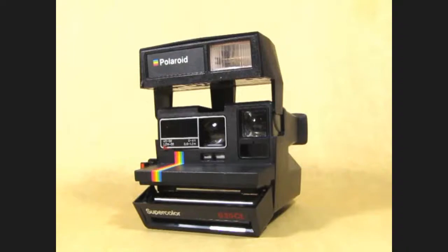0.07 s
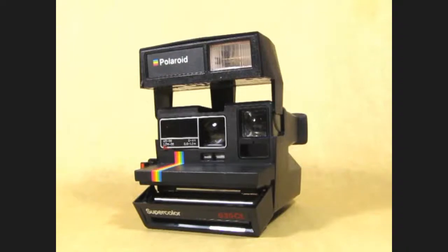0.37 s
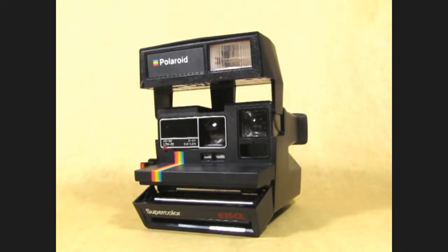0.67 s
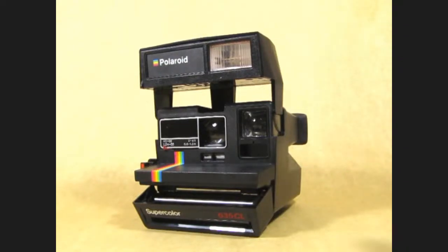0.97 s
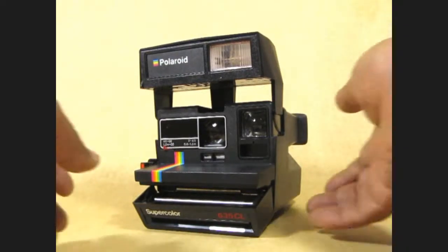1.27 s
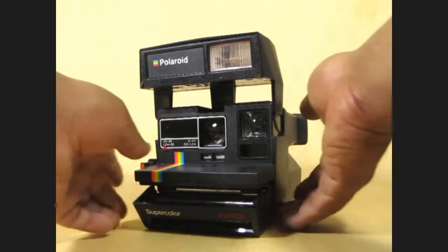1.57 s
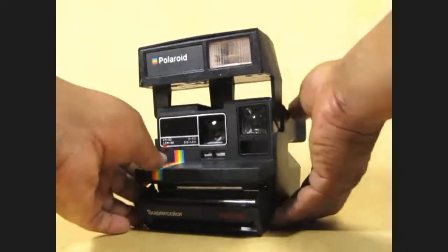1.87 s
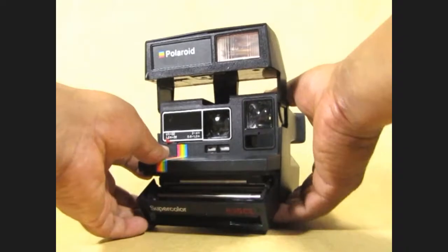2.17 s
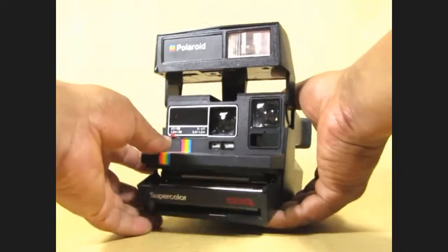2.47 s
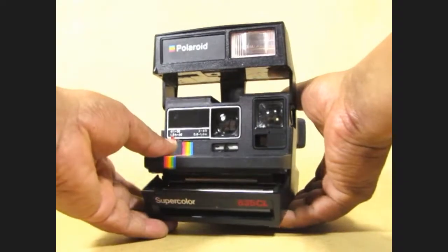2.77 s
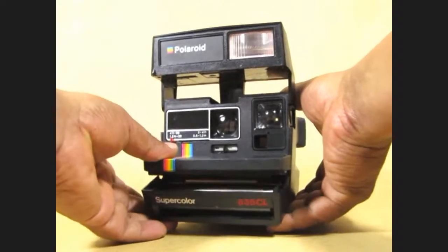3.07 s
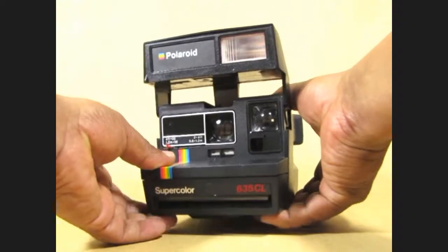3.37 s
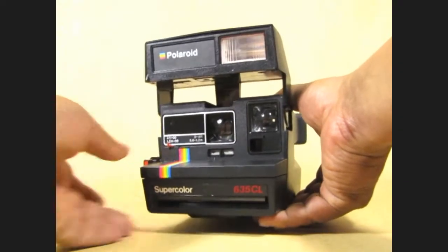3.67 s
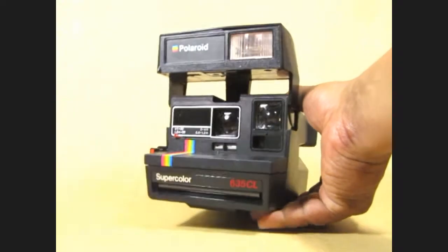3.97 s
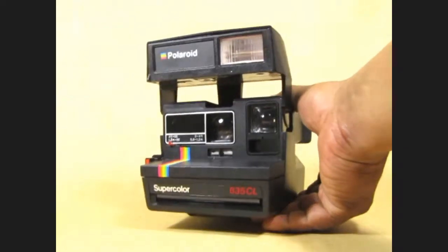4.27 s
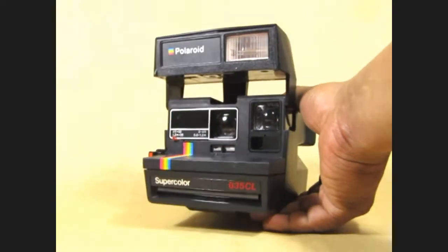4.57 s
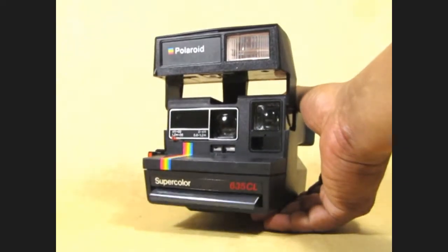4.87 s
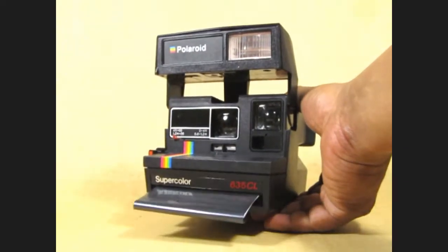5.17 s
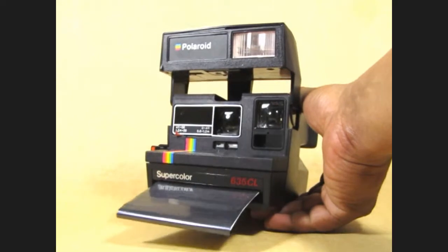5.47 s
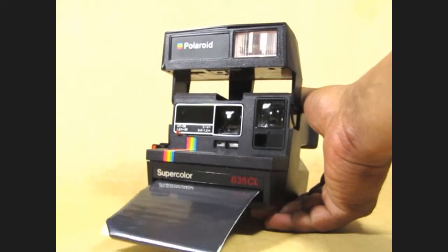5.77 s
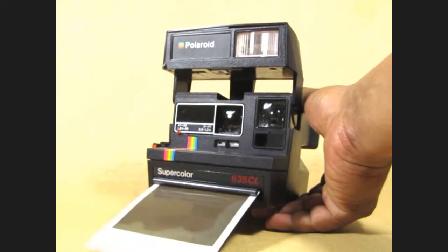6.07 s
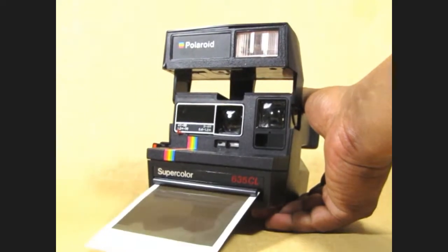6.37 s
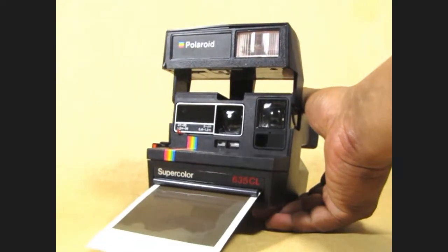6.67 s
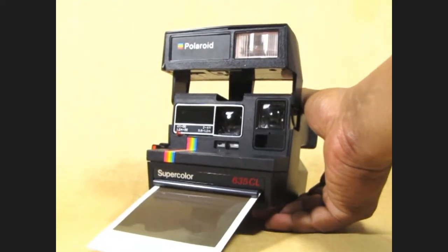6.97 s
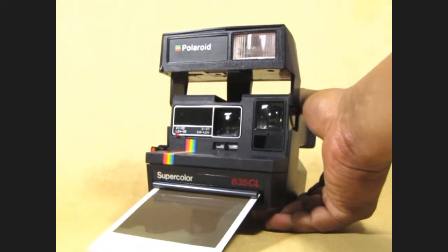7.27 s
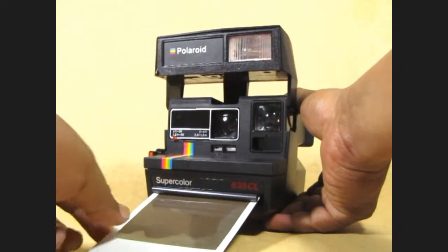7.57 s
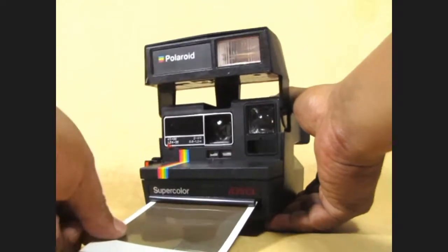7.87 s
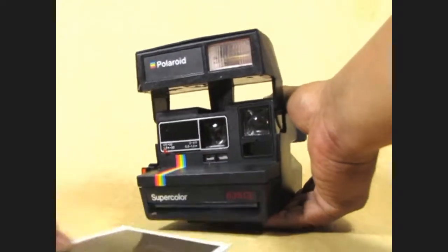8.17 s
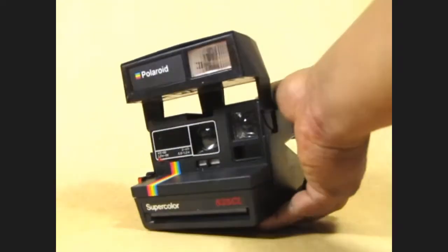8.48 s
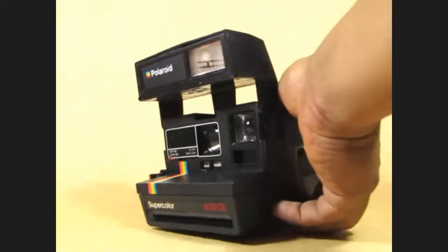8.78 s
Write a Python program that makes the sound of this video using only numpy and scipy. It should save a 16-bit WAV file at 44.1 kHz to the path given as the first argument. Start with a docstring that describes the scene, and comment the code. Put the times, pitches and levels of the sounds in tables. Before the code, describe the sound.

An instant camera is handled, its film door snaps shut, and a geared motor grinds out a picture with a sharp clack.

```python
"""Over the low drone of a small room, an instant camera is picked up from a cloth-covered table, close to
the microphone; hands rub and its plastic case ticks and creaks. The film door scrapes and snaps shut.
A geared motor grinds, sags as the rollers squeeze the picture out, clacks twice, leaving a spring ringing,
and runs out. After the snap and the clack the recorder's gain control briefly ducks everything.
Last, the picture is pulled free and the camera is turned."""
import sys
import numpy as np
from scipy import signal
from scipy.fft import rfft, irfft
from scipy.io import wavfile
from scipy.ndimage import uniform_filter1d

SR = 44100
rng = np.random.default_rng(int(sys.argv[2]) if len(sys.argv) > 2 else 0)


def inscribe(sig):
    """Save sig as 16-bit PCM at rate SR to the path in sys.argv[1].

    A 1-D sig is mono; a 2-D sig holds one channel per row.
    Samples are clipped to [-1, 1] before scaling.
    """
    pcm = np.round(np.clip(np.atleast_2d(sig).T, -1, 1) * 32767)
    wavfile.write(sys.argv[1], SR, pcm.astype(np.int16))


N = 389844
TIME = np.arange(N) / SR
HZ = np.fft.rfftfreq(N, 1 / SR)


def gain_of(db):
    """The decibel scale: amplitude grows tenfold every 20 dB."""
    return 10 ** (np.asarray(db) / 20)


def unit_rms(x):
    """Normalisation to a mean power of 1."""
    return x / np.sqrt(np.mean(x ** 2) + 1e-20)


def curve_at(points, hz):
    """Linear interpolation over log frequency."""
    point_hz, value = np.transpose(points)
    return np.interp(np.log(hz + 1), np.log(point_hz + 1), value)


def add(mix, start_s, sound):
    """Superposition: a stereo sound adds to the mix from start_s on."""
    part = mix[:, round(start_s * SR):][:, :sound.shape[1]]
    part += sound[:, :part.shape[1]]


def resonances(modes, hz):
    """Resonance: each mode (frequency, bandwidth, height) adds a Lorentzian peak."""
    return sum(height / (1 + (2 * (hz - centre) / width) ** 2) for centre, width, height in modes)


def ripple(width_hz):
    """Modal overlap: the many small resonances of a hollow body merge into a spectral ripple of rms 1."""
    fine = rng.standard_normal(len(HZ))
    for _ in range(2):
        fine = uniform_filter1d(fine, max(round(width_hz / HZ[1]), 1))
    return unit_rms(fine)


def wander(rate_hz):
    """Band-limited noise: a smooth fluctuation of rms 1, up to about rate_hz."""
    points = rng.standard_normal(int(N / SR * 2 * rate_hz) + 2)
    return unit_rms(signal.resample_poly(points, int(SR / (2 * rate_hz)) + 1, 1)[:N])


def swell(peak_s, length_s, rise_share=0.38, edge_db=-18):
    """The amplitude envelope of one movement: it rises to 1 and dies away more slowly."""
    distance = np.maximum((peak_s - TIME) / rise_share, (TIME - peak_s) / (1 - rise_share)) / length_s
    return gain_of(edge_db * np.minimum(distance, 4) ** 1.5)


def grains(per_s, size_db):
    """Shot noise: two trains of tiny impacts at random times, a few larger than the rest."""
    size = gain_of(size_db * np.minimum(rng.exponential(1, (2, N)), 5))
    return unit_rms(size * rng.choice([-1, 1], (2, N)) * (rng.random((2, N)) < per_s / SR))


def treble_of(x, hz):
    """High-pass filtering: the part of a sound above hz."""
    return irfft(rfft(x) * HZ ** 4 / (HZ ** 4 + hz ** 4), N)


def minimum_phase(db):
    """Causality: the response with this gain that rings only after it is struck."""
    cepstrum = irfft(db * np.log(10) / 20)
    half = len(cepstrum) // 2
    cepstrum[1:half] *= 2
    cepstrum[half + 1:] = 0
    return np.exp(rfft(cepstrum))


# left-right coherence of a source in front: (frequency [Hz], correlation [-])
FRONT_COHERENCE = [(600, 0.95), (1400, 0.9), (2800, 0.47), (9000, 0.5)]
def spread(pair, hz, coherence=FRONT_COHERENCE):
    """Partial coherence: two unrelated spectra become left and right, most alike in the bass."""
    correlation = np.clip(curve_at(coherence, hz), -1, 1)
    mid = pair[0] * np.sqrt((1 + correlation) / 2)
    side = pair[1] * np.sqrt((1 - correlation) / 2)
    return np.array([mid + side, mid - side])


def coloured(pair, db, coherence=FRONT_COHERENCE):
    """Source and filter: two unrelated drives become a stereo sound of rms 1, shaped by db."""
    return unit_rms(irfft(spread(rfft(pair), HZ, coherence) * gain_of(db), N))


# low noise of room and table: (frequency [Hz], relative level [dB])
RUMBLE_SPECTRUM = [(20, -8), (38, -13), (60, 2.5), (105, -11), (230, -17.5), (320, -17.5), (1000, -30.5),
                   (8000, -51), (15000, -76.5)]
# the table rumbles as the hands come in and tip the camera up, under the labouring motor,
# and as the camera is turned: (peak time [s], duration [s], level [dB])
TABLE_RUMBLES = [(0.905, 1.7, -45.5), (2.195, 3.24, -40), (4.997, 2.9, -46), (8.46, 1.1, -48)]
def rumble(drone_db=-53, hum_hz=60, hum_db=-3.5, waver=0.4):
    """Incoherent sources add in power: room drone and table set the level of a low noise and a hum."""
    table_power = sum((gain_of(db) * swell(peak_s, length_s)) ** 2 for peak_s, length_s, db in TABLE_RUMBLES)
    hum = np.sin(2 * np.pi * hum_hz * TIME + 0.51 * wander(4.0)) * (1 + waver * wander(4.8))
    noise = coloured(rng.standard_normal((2, N)), curve_at(RUMBLE_SPECTRUM, HZ))
    return np.sqrt(gain_of(drone_db) ** 2 + table_power) * (noise + gain_of(hum_db) * hum)


# resonances of the plastic case, its hollow and the cloth's rasp:
# (frequency [Hz], bandwidth [Hz], gain [dB])
CASE_MODES = [(315, 190, 9), (693, 80, 5.5), (915, 110, 6), (1800, 120, 3), (3050, 90, 2.5)]
CAVITY_MODES = [(1080, 300, -4.5), (1480, 120, 1), (2100, 500, 1.5)]
RASP_MODES = [(2330, 110, 6.4)]
# friction noise of rubbing and of dry cloth: (frequency [Hz], relative level [dB])
RUB_SPECTRUM = [(100, -12), (330, -2), (520, -6), (900, -1), (1200, 0), (2000, -4), (3500, -4.5),
                (5000, -7.5), (8000, -13), (12000, -22), (15500, -36.5)]
RASP_SPECTRUM = [(700, -29.5), (1600, -1), (2400, -1), (4600, -6), (15000, -49)]
# left-right coherence of rubbing that comes from all around: (frequency [Hz], correlation [-])
RUB_COHERENCE = [(400, 0.71), (1600, .52), (5000, .05)]
# hands and sleeves brush case and cloth:
# (peak time [s], duration [s], level [dB], relative treble [dB], relative rasp [dB])
HAND_STROKES = [(0.59, 0.27, -52.5, -1, -4.5), (0.95, 2, -58.5, -8, -2.5), (1.423, 1.2, -48, -4.5, 0),
                (1.942, 2.1, -50.5, -8, -19), (2.118, 0.17, -40, -7, -15), (2.684, 0.5, -44.5, -5, -13),
                (7.52, 0.32, -56.5, 11.5, 8), (7.926, 0.31, -46, -6, -19), (8.27, 0.88, -48, 6, 2.5),
                (8.482, 0.59, -39, 6, -4.5), (8.82, 0.91, -38, -7, -20)]
def hands(case_share=0.81, resting_db=-66.5, uneven_db=1.3, treble_hz=5200, left_lean_db=1):
    """Sliding friction: skin and cloth slip in tiny grains, and catching threads add a coarser rasp."""
    body_db = case_share * resonances(CASE_MODES, HZ) + resonances(CAVITY_MODES, HZ) + 1.5 * ripple(70)
    rub = coloured(grains(per_s=6200, size_db=0.5), curve_at(RUB_SPECTRUM, HZ) + body_db, RUB_COHERENCE)
    threads = grains(per_s=5000, size_db=1.4)
    threads_db = curve_at(RASP_SPECTRUM, HZ) + resonances(RASP_MODES, HZ) + ripple(70)
    rasp = coloured(threads, threads_db, RUB_COHERENCE)
    treble = treble_of(rub, treble_hz)
    low_power = high_power = gain_of(resting_db) ** 2  # a faint rub goes on between strokes
    rasp_power = 0
    for peak_s, length_s, db, treble_db, rasp_db in HAND_STROKES:
        power = (gain_of(db) * swell(peak_s, length_s)) ** 2
        low_power = low_power + power
        high_power = high_power + power * gain_of(treble_db) ** 2
        rasp_power = rasp_power + power * gain_of(rasp_db) ** 2
    rubbing = (rub - treble) * np.sqrt(low_power) + treble * np.sqrt(high_power)
    rubbing += rasp * np.sqrt(rasp_power)
    return rubbing * gain_of(uneven_db * wander(20)) * gain_of([[left_lean_db / 2], [-left_lean_db / 2]])


DOOR_FROM_S, DOOR_TO_S = 3.1, 3.4
# the hollow film door rings while it is pushed shut: (frequency [Hz], bandwidth [Hz], gain [dB])
DOOR_MODES = [(1040, 150, 6.5), (1240, 90, -5.5), (1435, 100, 9), (1900, 200, 2.5)]
# fingers grip the case, the door latches, the gears catch and clack, the picture snaps free, the camera
# turns: (time [s], level [dB], ring [Hz], bass re ring [dB], treble re ring [dB], decay T60 [s])
IMPACTS = [ (1.18, -33.5, 1370, -1.5, -12.5, 0.14), (1.241, -32.5, 2700, -12, -25, 0.079),
           (1.687, -42.5, 1500, -2, -22, 0.05), (1.833, -34, 600, 4, -37, 0.039),
           (1.892, -37, 1000, -12, -38, 0.085), (2.199, -38.5, 1010, -27, -38, 0.071),
           (2.3, -39, 1000, 1, -26, .12), (2.316, -27.5, 2800, -9.5, -20, 0.018),
           (2.547, -21.5, 1120, -15.5, -25.5, 0.065), (2.569, -35, 1000, -10, -19, 0.082),
           (2.709, -36.5, 298, 9, -17, 0.045), (2.908, -34.5, 3030, -8, -20, 0.022),
           (3.061, -46, 950, -5, -9.5, .032), (3.359, 3, 1110, -15, -6.5, 0.012),
           (3.377, -13, 2000, -2, 2, 0.035), (3.945, -30.5, 1200, -8, -32, 0.2),
           (4.614, -25, 855, -3, -11.5, 0.15), (5.403, -20.5, 2580, -16, -8.5, 0.049),
           (5.537, -19, 1280, -19, -20, 0.028), (5.85, -18.5, 1700, -16, -5.5, 0.021),
           (5.953, -13, 4200, -51, -10.5, 0.023), (5.968, 8.5, 2700, -27, -10.5, 0.01),
           (6.044, -9.5, 630, -18, -20, 0.048), (6.257, -17, 1170, -11.5, -17, 0.06),
           (6.521, -37, 348, 3, -26.5, 0.058), (7.053, -47, 2720, 8.5, -3, 0.044),
           (7.4, -38, 1920, -8, -18, 0.028), (8.112, -19, 760, -11, -26, 0.028),
           (8.1195, -13, 945, -3, -19, 0.016), (8.171, -37, 2720, -25, -17, 0.037),
           (8.44, -30.5, 1000, -2, -16, 0.029), (8.794, -30.5, 1710, -11, -26, 0.035)]
def knocks(soft_t60=0.4, ring_db=3, shell_hz=4600, size=16384):
    """Impact excitation: loose plastic parts chatter and die away, filtered by struck part and case."""
    t, hz = np.arange(size) / SR, np.fft.rfftfreq(size, 1 / SR)
    attack = round(0.012 * SR)  # the level holds for this opening stretch
    out = np.zeros((2, N))
    for start_s, db, ring_hz, bass_db, treble_db, t60 in IMPACTS:
        rise_s = (t60 / soft_t60) ** 2 / 20  # long knocks start softly
        chatter = rfft(rng.standard_normal((2, size)) * gain_of(-60 * t / t60) * (1 - np.exp(-t / rise_s)))
        # whiten the chatter, so that part and case alone set the colour
        chatter_db = 10 * np.log10(uniform_filter1d(abs(chatter) ** 2, size=120))
        chatter *= np.array([minimum_phase(-channel_db) for channel_db in chatter_db])
        part_spectrum = sorted([
            (60, bass_db - 10), (250, bass_db), (ring_hz, 0), (shell_hz, 0.5 * treble_db),
            (6300, 0.82 * treble_db), (10000, treble_db - 4), (15000, 1.6 * treble_db - 14)])
        # each spot on the shell stirs its own mix of the higher resonances
        spot_db = 2.5 * np.interp(hz, HZ, ripple(220)) * np.minimum(hz / 2500, 1)
        door_modes = DOOR_MODES if DOOR_FROM_S < start_s < DOOR_TO_S else []
        modes_db = resonances([*CASE_MODES, *door_modes, (ring_hz, ring_hz / 2, ring_db)], hz)
        response = minimum_phase(curve_at(part_spectrum, hz) + spot_db + modes_db)
        knock = irfft(spread(chatter, hz) * response)
        attack_rms = np.sqrt(np.mean(knock[:, :attack] ** 2))
        add(out, start_s, gain_of(db) * knock[:, :size // 2] / attack_rms)
    return out


# the film door, and later the picture, slide on plastic:
# (start [s], end [s], first level [dB], last level [dB], spectral peak [Hz], relative treble [dB])
SLIDING_STROKES = [(3.157, 3.245, -36, -43, 1199, -17.5), (3.285, 3.335, -42.5, -45, 1380, -20),
                   (3.319, 3.387, -33.5, -16.5, 1350, -14.5), (7.183, 7.249, -42.5, -42.5, 3260, -9.5),
                   (7.399, 7.617, -45.5, -44, 2230, -13), (7.612, 7.802, -54, -34.5, 2710, -19),
                   (8.063, 8.138, -47, -22, 3500, -0.5)]
def scrapes(bass_db=-9, attack_s=0.0054, release_share=0.46, focus_db=3):
    """Stick-slip friction in short strokes: the door rings hollow, the picture scrapes all around."""
    slips = grains(per_s=6000, size_db=1.9)
    out = np.zeros((2, N))
    for start_s, end_s, first_db, last_db, peak_hz, treble_db in SLIDING_STROKES:
        stroke = slips[:, round(start_s * SR):round(end_s * SR)]
        count = stroke.shape[1]
        t, hz = np.arange(count) / SR, np.fft.rfftfreq(count, 1 / SR)
        is_door = start_s < DOOR_TO_S
        modes, coherence = (DOOR_MODES, FRONT_COHERENCE) if is_door else (CAVITY_MODES, RUB_COHERENCE)
        colour_db = curve_at([(250, bass_db), (peak_hz, 0), (7000, treble_db), (15000, treble_db - 17)], hz)
        colour_db += resonances([*CASE_MODES, *modes, (peak_hz, peak_hz / 2, focus_db)], hz)
        scrape = unit_rms(irfft(spread(rfft(stroke), hz, coherence) * gain_of(colour_db), count))
        fades = np.minimum(t / attack_s, 1) * np.minimum(t[::-1] / (release_share * t[-1]), 1)
        add(out, start_s, scrape * gain_of(np.linspace(first_db, last_db, count)) * fades)
    return out


def tooth_impacts(turns, count=23, backlash_turns=0.015):
    """Quasi-periodic excitation: an uneven pattern of strikes repeats each turn, loosened by backlash."""
    place, force = rng.random(count), unit_rms(rng.standard_normal(count))
    whole_turns = np.arange(int(turns[-1]))[:, None]
    play = backlash_turns * rng.standard_normal((len(whole_turns), count))
    strike_samples = np.interp(whole_turns + place + play, turns, np.arange(N)).astype(int)
    return unit_rms(np.bincount(strike_samples.ravel(), np.tile(force, len(whole_turns)), N))


def drifting_colour(x, depth_db, size=512):
    """Spectral modulation: patches some hundred Hz wide swell and fade in about a tenth of a second."""
    spectra = signal.stft(x, nperseg=size)[2]
    patches = rng.standard_normal(spectra.shape[1:])
    for _ in range(2):
        patches = uniform_filter1d(uniform_filter1d(patches, size=6, axis=0), size=14, axis=1)
    return signal.istft(spectra * gain_of(depth_db * unit_rms(patches)), nperseg=size)[1][:, :N]


# gear noise running free and under load: (frequency [Hz], relative level [dB])
FREE_SPECTRUM = [(60, -24.5), (215, -19), (327, -12.5), (480, -16.5), (660, -4), (1050, -3), (1830, -7),
                 (2840, -14.5), (3900, -15), (6000, -19.5), (8870, -23), (12500, -32.5), (15500, -44.5)]
LOADED_SPECTRUM = [(60, -13.5), (139, -5.5), (215, -29), (278, -12.5), (423, -2.5), (480, -27.5),
                   (620, 1.5), (900, 0.5), (1520, -8), (3760, -3.5), (5580, -8), (8500, -15),
                   (11700, -23.5), (15500, -37)]
# resonances of the gear frame: (frequency [Hz], bandwidth [Hz], gain [dB])
FRAME_MODES = [(322, 21, 8.5), (1630, 36, 4), (1806, 63, 5), (2160, 77, 4.5), (3050, 80, 2.5),
               (3800, 420, 4.5), (4310, 45, 4), (5595, 170, 8)]
def gear_grinding(turns, load, rattle=0.47, throb=0.073, treble_hz=4800):
    """Forced vibration: teeth scrape and rattle in the gear frame, and load brightens the noise."""
    drive = grains(per_s=9000, size_db=1.5)
    drive += rattle * np.array([tooth_impacts(turns), tooth_impacts(turns)])
    # the mesh tightens once a turn, and unevenly with the slower wheels
    drive = drive * (1 + throb * np.cos(2 * np.pi * turns)) * gain_of(wander(50.3))
    frame_db = resonances(FRAME_MODES, HZ) + 2 * ripple(35) * np.minimum(HZ / 2000, 1)
    free = coloured(drive, curve_at(FREE_SPECTRUM, HZ) + frame_db)
    loaded = coloured(drive, curve_at(LOADED_SPECTRUM, HZ) + frame_db)
    grind = np.sqrt(1 - load) * free + np.sqrt(load) * loaded
    # the treble flares as the gears catch and dips as the motor bogs down
    treble_db = 7 * swell(peak_s=3.5, length_s=0.22) - 7.5 * swell(peak_s=4.79, length_s=0.28)
    grind += treble_of(grind, treble_hz) * (gain_of(treble_db) - 1)
    return drifting_colour(grind, depth_db=1.1)


# resonances that the pinion excites: (frequency [Hz], bandwidth [Hz], relative level [dB])
PINION_MODES = [(2090, 260, -9.5), (3740, 260, -13), (5680, 110, -12.5)]
def pinion_whine(speed, turns, mesh_order=13.5):
    """Swept resonance: the mesh tone and two overtones sing out where the speed carries them over a mode."""
    peaks = [(hz, width, gain_of(db)) for hz, width, db in PINION_MODES]
    out = np.zeros(N)
    for order in mesh_order * np.arange(1, 4):
        phase = 2 * np.pi * order * turns + 0.8 * wander(70)
        tone = np.sqrt(2) * np.cos(phase) * (1 + 0.35 * wander(140))
        out += tone * resonances(peaks, order * speed)
    return out


# tones of the gears: (order [cycles per turn], relative level free [dB], relative level loaded [dB])
GEAR_ORDERS = [(1.6, -21, -30), (2, -38, -23), (3.2, -14, -35), (4, -17, -11)]
def gear_whine(speed, turns, load, steady_turns_per_s=148, stall_db=-73):
    """Rotational orders: tones follow multiples of the shaft speed and fade as it falls towards a stall."""
    jitter_rad = 0.45 + 0.4 * (1 - load)
    out = np.zeros(N)
    for order, free_db, loaded_db in GEAR_ORDERS:
        phase = 2 * np.pi * order * turns + jitter_rad * wander(45)
        tone = np.sqrt(2) * np.cos(phase) * (1 + 0.45 * wander(45))
        out += tone * (gain_of(free_db) + load ** 2 * (gain_of(loaded_db) - gain_of(free_db)))
    return out * gain_of(stall_db * np.clip(1 - speed / steady_turns_per_s, 0, 1))


CLACK_S = 5.968
def roller_load(feed_s=4.07, grip_s=4.98, full_load=0.96, cam_load=0.23):
    """Mechanical load, 0-1: it builds as the rollers grip the picture; after the clack only a cam is left."""
    gripped = np.clip((TIME - feed_s) / (grip_s - feed_s), 0, 1)
    return np.where(TIME < CLACK_S, full_load * gripped, cam_load)


# the motor runs fast, then labours as the picture goes through: (time [s], speed [turns/s])
SHAFT_SPEED = [(3.55, 202), (4.0, 211), (4.22, 205), (4.53, 204), (4.83, 172), (4.92, 159), (5.04, 150),
               (5.13, 154), (5.2, 142), (5.27, 137.5), (5.41, 143), (5.5, 139), (5.69, 152), (5.78, 151),
               (5.94, 159)]
def motor(on_s=3.399, off_s=6.245, rise_s=0.13, coast_t60=0.39, free_db=-29, load_db=5.5, surge_db=5.5):
    """Gear noise: one shaft drives grinding and whine, slower and louder under the rollers' load."""
    speed = np.interp(TIME, *np.transpose(SHAFT_SPEED)) * (1 + 0.008 * wander(25))
    turns = np.cumsum(speed) / SR
    load = roller_load()
    grind = gain_of(-3) * gear_grinding(turns, load)
    whine = load ** 2 * pinion_whine(speed, turns) + gear_whine(speed, turns, load)
    fade_in = np.clip((TIME - on_s) / rise_s, 0, 1)
    run_out = gain_of(-60 * np.maximum(TIME - off_s, 0) / coast_t60)
    level_db = free_db + load_db * load ** 2 + surge_db * swell(peak_s=3.707, length_s=1)
    return fade_in * run_out * gain_of(level_db) * (grind + whine)


# modes of a spring: (frequency [Hz], level [dB], decay T60 [s])
SPRING_MODES = [(594, -25.5, 0.54), (930, -33, 1.2)]
def spring():
    """Damped free vibration: two faint modes ring on after the clack."""
    t = np.maximum(TIME - CLACK_S, 0)
    return sum(gain_of(db - 60 * t / t60) * np.sin(2 * np.pi * hz * t) for hz, db, t60 in SPRING_MODES)


# reverberation time of the small room: (frequency [Hz], decay T60 [s])
ROOM_DECAY = [(500, 0.19), (4000, 0.1), (12000, 0.088)]
def room(x, density=0.08, gap_s=0.006, size=20000):
    """Reverberation: sparse reflections of random sign, each band dying at its own rate."""
    taps = rng.choice([-1., 1.], (2, size)) * (rng.random((2, size)) < density)
    taps[:, :round(gap_s * SR)] = 0
    taps = irfft(spread(rfft(taps), np.fft.rfftfreq(size, 1 / SR)))
    hz, t, spectra = signal.stft(taps, SR, nperseg=256)
    decay = gain_of(-60 * t / curve_at(ROOM_DECAY, hz)[:, None])
    tail = signal.istft(spectra * decay, SR, nperseg=256)[1]
    return signal.fftconvolve(x, tail / np.linalg.norm(tail[0]), axes=1)[:, :N]


def scene(room_db=-18):
    """Superposition: the camera's direct sound, its reverberation, and a rumble that leans to the left."""
    camera = motor() + knocks() + scrapes() + spring() + hands()
    return camera + gain_of(room_db) * room(camera) + rumble() * gain_of([[0.7], [-0.7]])


def gain_control(x, limit_db=-5.5, recover_db_per_s=18.5, size=132):
    """Limiting: the gain drops at once to hold a hard snap at the limit, then creeps back."""
    power_db = 10 * np.log10(abs(uniform_filter1d((x ** 2).mean(0), size)) + 1e-12)
    recovery_db = recover_db_per_s * TIME
    held_peak_db = np.maximum.accumulate(power_db + recovery_db) - recovery_db
    over_db = np.maximum(held_peak_db - limit_db, 0)
    return x * gain_of(-uniform_filter1d(over_db, size // 4))


# narrow dips in the microphone's response: (frequency [Hz], bandwidth [Hz])
MICROPHONE_NOTCHES = [(5915, 90), (7860, 280)]
def record(dry, start_s=0.1, overload=0.9, edge_hz=15750):
    """Transduction: the microphone's dips, gain control, clipping of the hardest snaps, a band limit."""
    for hz, width in MICROPHONE_NOTCHES:
        dry = signal.lfilter(*signal.iirnotch(hz, hz / width, SR), dry)
    clipped = np.clip(gain_control(dry) * (TIME > start_s), -overload, overload)
    low_pass = signal.firwin(511, edge_hz, window=("kaiser", 9), fs=SR)
    return signal.oaconvolve(clipped, low_pass[None], "same")


dry = scene()
out = record(dry)
inscribe(out)
```